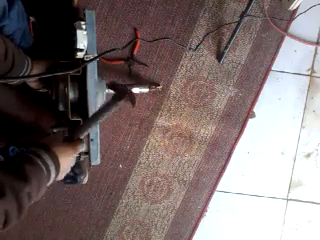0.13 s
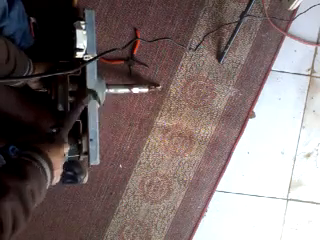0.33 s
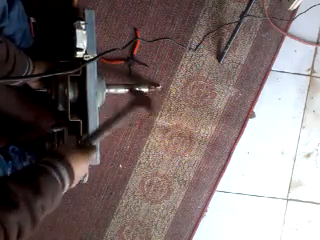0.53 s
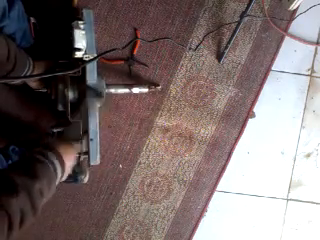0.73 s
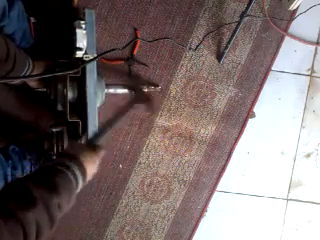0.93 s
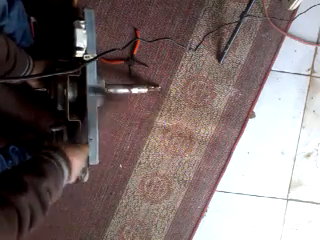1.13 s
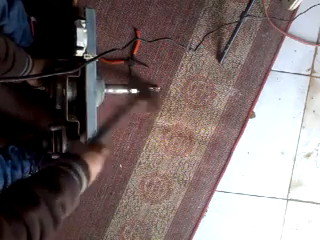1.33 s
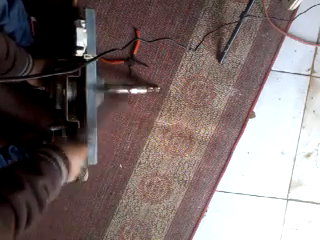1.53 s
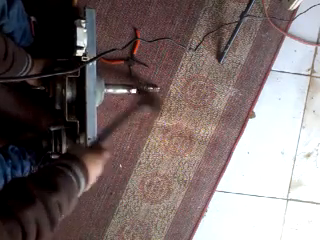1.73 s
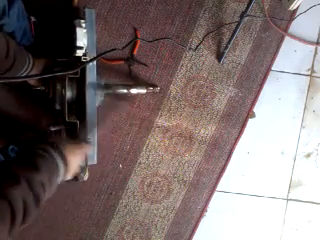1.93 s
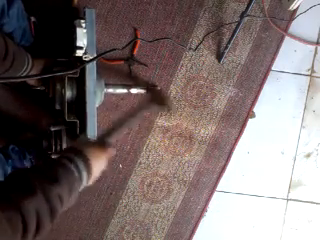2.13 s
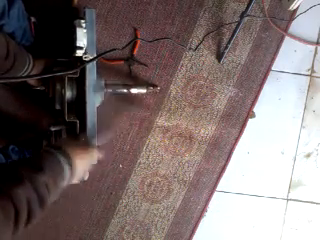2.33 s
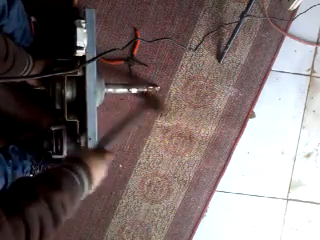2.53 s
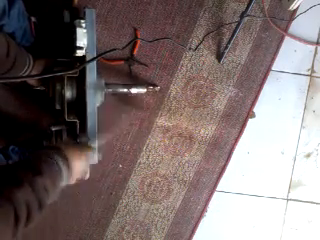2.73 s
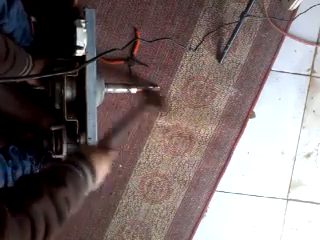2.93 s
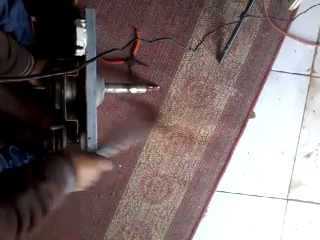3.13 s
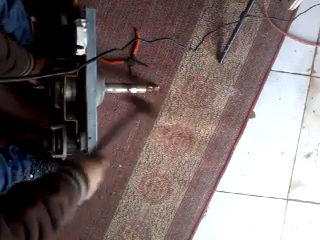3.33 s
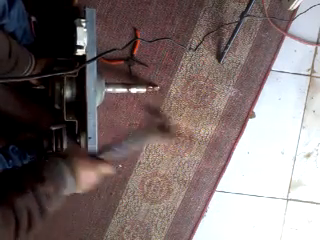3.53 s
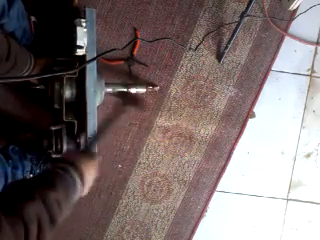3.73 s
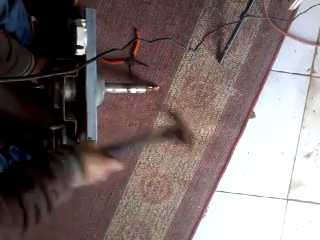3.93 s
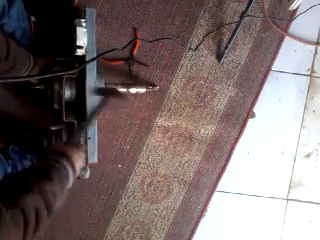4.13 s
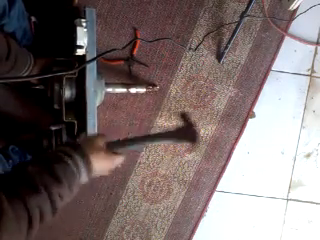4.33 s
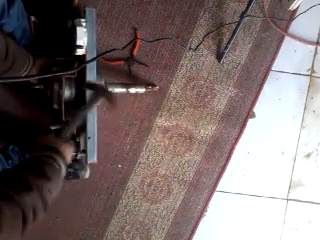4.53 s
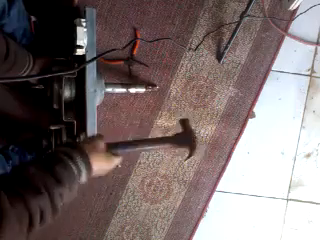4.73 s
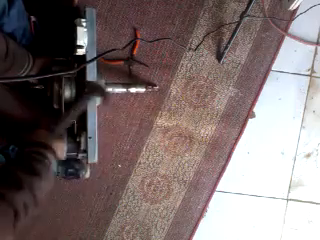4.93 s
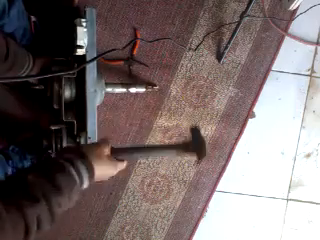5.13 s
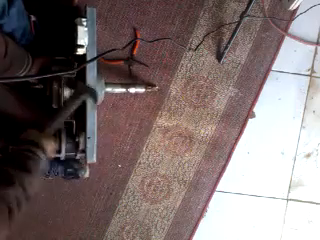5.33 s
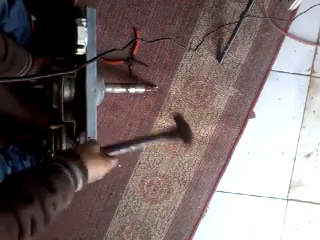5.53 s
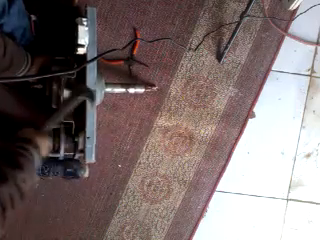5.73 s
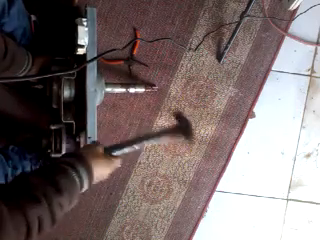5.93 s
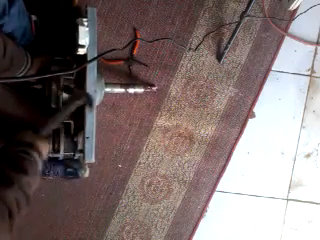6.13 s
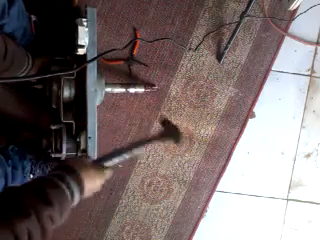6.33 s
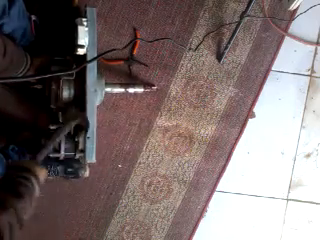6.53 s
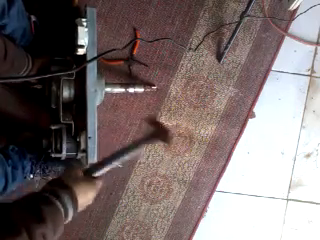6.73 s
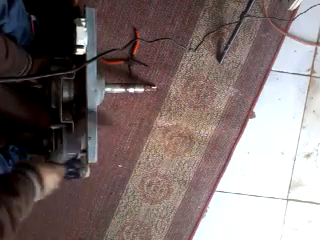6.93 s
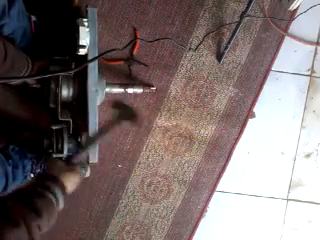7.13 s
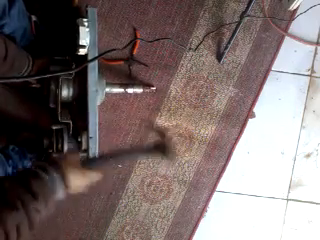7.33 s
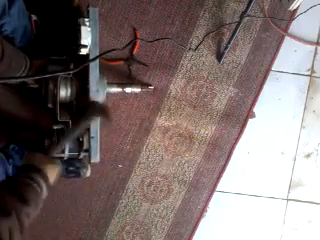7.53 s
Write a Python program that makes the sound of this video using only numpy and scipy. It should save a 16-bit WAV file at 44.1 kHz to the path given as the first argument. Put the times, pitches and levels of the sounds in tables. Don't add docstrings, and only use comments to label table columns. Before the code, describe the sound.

After a fading dull knock and faint ticks, even hammer blows clang on steel, ringing and rattling close by in a reverberant indoor room.

```python
import sys
import numpy as np
from scipy import signal
from scipy.fft import rfft, irfft
from scipy.io import wavfile
from scipy.ndimage import uniform_filter1d

SR = 44100
rng = np.random.default_rng(int(sys.argv[2]) if len(sys.argv) > 2 else 0)


def voltage_ratio(decibels):
    exponent = np.asarray(decibels, float) / 20
    return 10 ** exponent


def inscribe(sig):
    pcm = np.round(np.clip(np.atleast_2d(sig).T, -1, 1) * 32767)
    wavfile.write(sys.argv[1], SR, pcm.astype(np.int16))


N = 332955


def on_log_hz(table, hz):
    at, value = np.transpose(table)
    return np.interp(np.log(np.maximum(hz, 1)), np.log(at), value)


def coloured(size, table):
    spectrum = rfft(rng.standard_normal(size))
    gain = voltage_ratio(on_log_hz(table, np.fft.rfftfreq(size, 1 / SR)))
    x = irfft(spectrum * gain, size)
    return x / np.sqrt(np.mean(x ** 2))


def fade(t, t60):
    return np.exp(-np.log(1000) * t / t60)


# frequency in Hz, level in dB per Hz.
SHOP_HUSH = [(18, -34.5), (30, -3), (49, -38), (112, 2), (586, -16.5), (795, -7), (1390, -14), (5620, -14),
             (8880, -19), (13000, -22.5)]


def hush():
    return voltage_ratio(-45.5 - 24.0) * coloured(N, SHOP_HUSH)


# frequency in Hz, level in dB per Hz.
KNOCK_COLOUR = [(24, -57), (40, -25.5), (152, -1.5), (189, -14), (335, -11.5), (579, -15.5), (637, -16),
                (1240, -26), (8390, -33), (12000, -35), (15600, -60), (22000, -120)]


def dying_knock():
    knock_db, knock_t60_s = -51.5, 0.73
    return voltage_ratio(knock_db) * fade(np.arange(N) / SR, knock_t60_s) * coloured(N, KNOCK_COLOUR)


# start in seconds, peak in dB, pitch in Hz, t60 in seconds, scrape share from 0 to 1.
LOOSE_TICKS = [
    (0.007, -50, 2900, 0.04, 0.5),
    (0.011, -52, 3060, 0.04, 0.6),
    (0.114, -50, 832, 0.04, 0.5),
    (0.17, -51, 5640, 0.04, 0.6),
    (0.179, -51, 4730, 0.04, 0.7),
    (0.221, -54, 4830, 0.076, 0.5),
    (0.248, -56, 802, 0.04, 0.7),
    (0.254, -50, 5550, 0.04, 0.4),
    (0.311, -54, 6390, 0.04, 0.7),
]


def ticks():
    out, t = np.zeros(N), np.arange(SR // 10) / SR
    for s, peak_db, hz, t60, scrape in LOOSE_TICKS:
        grit = signal.lfilter([1], [1, -1.1, 0.55], rng.standard_normal(len(t))) * 0.37
        sound = (1 - scrape) * np.sin(2 * np.pi * hz * t) + scrape * grit
        out[int(s * SR):][:len(t)] += voltage_ratio(peak_db - 1.5) * fade(t, max(t60, 0.005)) * sound
    return out


# frequency in Hz, t60 in seconds.
WALL_T60 = [(70, 0.2), (125, 0.67), (300, 0.54), (800, 0.62), (1500, 0.59), (3000, 0.52), (5500, 0.49),
            (8000, .42), (12000, 0.37)]
# frequency in Hz, level in dB.
WALL_COLOUR = [(60, -8), (125, 5.7), (300, -1), (800, 3.7), (3000, -5), (5500, -3), (9000, -3),
               (14000, -10)]


def room():
    t = np.arange(SR) / SR
    hz = np.fft.rfftfreq(SR, 1 / SR)
    echoes = rfft(rng.standard_normal((2, SR)))
    tail = 0
    for centre in 40 * 2 ** np.arange(0, 9, 1 / 3):
        share = np.clip(1 - 3 * np.abs(np.log2(np.maximum(hz, 1) / centre)), 0, 1)
        band = irfft(echoes * share, SR)
        tail = tail + voltage_ratio(on_log_hz(WALL_COLOUR, centre)) * band * fade(t, on_log_hz(WALL_T60, centre))
    thickening = 1 - np.exp(-(t / 0.0035) ** 2)
    return voltage_ratio(-23) * tail * thickening


def looseness_db(s):
    loose_db, beds_in_s = -9.5, 2.2
    return loose_db * np.exp(-s / beds_in_s)


# frequency in Hz, level in dB per Hz.
FLOOR_RUMBLE = [(25, -12.5), (50, -15.5), (90, -6), (140, 3.5), (190, -5), (280, -23), (600, -73),
                (22000, -120)]


def rumble(s, t):
    swell = 1 - np.exp(-(t / 0.045) ** 2)
    return voltage_ratio(-44 + looseness_db(s)) * swell * fade(t, 0.82) * coloured(len(t), FLOOR_RUMBLE)


def floor_thud(t, thud_db):
    start_hz, sag_s = 256, 0.0077
    cycles = start_hz * sag_s * (1 - np.exp(-t / sag_s))
    pulse = (t / 0.0017) * np.exp(1 - t / 0.0015)
    return voltage_ratio(thud_db + 3.5) * pulse * np.sin(2 * np.pi * cycles)


def chatter(t):
    rattle_t60_s = 0.05
    onset = 1 - np.exp(-t / 0.0015)
    rattle = voltage_ratio(-13) * fade(t, rattle_t60_s) * onset * rng.standard_normal(len(t))
    rattle += voltage_ratio(-14.5) * fade(t, 0.015) * np.diff(rng.standard_normal(len(t) + 1))
    rattle += voltage_ratio(-12.5) * fade(t, 0.017) * rng.standard_normal(len(t))
    return rattle


# time of the blow in seconds, frequency in Hz, level over the body in dB.
SINGING_PARTIALS = [(0.44, 1590, 0.5), (3.31, 4290, 1.5), (0.44, 1180, 4), (0.88, 3160, 11.5),
                    (0.88, 4050, 3), (1.28, 773, 3.5), (3.72, 4217, 4), (1.69, 5560, 4), (1.69, 4750, 4),
                    (2.09, 2055, 8.5), (2.09, 5095, 8), (2.49, 5410, 4.5), (5.81, 562, 6.5),
                    (2.89, 5540, 4), (3.31, 765, 5), (3.31, 5910, 5.5), (3.72, 814, 3), (3.72, 421, 7.5),
                    (4.97, 1494, 7), (4.97, 4410, 5), (4.97, 1250, 7), (5.4, 1170, 5.5), (5.81, 2150, -1),
                    (5.81, 1937, 3), (6.22, 1970, 2.5), (6.22, 5840, 5.5), (6.61, 767, 6.5),
                    (6.61, 4145, 9), (7.08, 4110, 4), (7.08, 4750, 5.5)]


def partials_at(s):
    return [(f, db) for at, f, db in SINGING_PARTIALS if abs(at - s) < 0.1]


def singing(s, push, t, slow):
    out = np.zeros(len(slow))
    for f, _ in partials_at(s):
        share = abs(push @ np.exp(2j * np.pi * f * t))
        out += voltage_ratio(-50.5) * share * fade(slow, 0.58) * np.sin(2 * np.pi * f * slow)
    return out


RING_WIDTH_HZ = 1170
# time in seconds, centre in Hz.
RING_PATH = [(0.9, 5486), (1.3, 5420), (2.1, 5380), (2.5, 5500), (2.9, 5370), (4.1, 5640), (6.2, 5450),
             (7.1, 5500)]


def ring_centre(s):
    return np.interp(s, *np.transpose(RING_PATH))


def shaft_ring(s, t, square_db):
    rings_db, shaft_t60_s = -12.5, 0.56
    hz = ring_centre(s) + RING_WIDTH_HZ * (rng.random((24, 1)) - 0.5)
    modes = np.sin(2 * np.pi * (hz * t + rng.random((24, 1)))).sum(axis=0)
    return voltage_ratio(square_db + rings_db - 14) * fade(t, shaft_t60_s) * modes


def resonance(hz, modes, db):
    return sum(voltage_ratio(db + top_db) ** 2 / (1 + (2 * (hz - f) / width) ** 2) ** 1.4 for f, width, top_db in modes)


def causal(power):
    cepstrum = irfft(np.log(power) / 2)
    fold = np.r_[1, np.full(len(power) - 2, 2), 1, np.zeros(len(power) - 2)]
    return irfft(np.exp(rfft(cepstrum * fold)))


# frequency in Hz, width in Hz, level in dB.
FRAME_MODES = [(252, 130, -12.5), (482, 77, -1), (626, 222, -2.5), (809, 93, 0.5), (1171, 100, -5.5)]
PLATE_MODES = [(1280, 870, -5), (1703, 395, 0.5), (2015, 120, 5.5), (2383, 500, 5.5)]
EDGE_MODES = [(2953, 377, -2), (3285, 140, 0.4), (3498, 222, -1.5)]
FLANGE_MODES = [(3760, 120, -6), (4175, 670, -1), (4830, 500, -4.5)]
SHAFT_END_MODES = [(6580, 800, 2), (7270, 1300, -5)]
HEAD_MODES = [(8050, 760, -3), (8840, 2320, -0.5), (11110, 1400, -2), (13100, 240, -1.5), (13100, 580, -8)]


def blow(s, strength_db, square_db, glancing_db):
    hz = np.fft.rfftfreq(4096, 1 / SR)
    loose_db = looseness_db(s)
    power = resonance(hz, FRAME_MODES, -8.5 + loose_db + 0.25 * strength_db)
    power += resonance(hz, PLATE_MODES, -14 - 6 + 0.81 * loose_db - 0.31 * glancing_db)
    power += resonance(hz, EDGE_MODES, 7.5 + glancing_db)
    power += resonance(hz, FLANGE_MODES, 8 + glancing_db)
    power += voltage_ratio(square_db + 5) ** 2 / (1 + (2 * (hz - ring_centre(s)) / RING_WIDTH_HZ) ** 6)
    power += resonance(hz, SHAFT_END_MODES, -10.5 + 1.1 * loose_db + 0.23 * strength_db)
    power += resonance(hz, HEAD_MODES, -18 + strength_db)
    for f, db in partials_at(s):
        width_hz = 50 + 0.005 * f
        power *= voltage_ratio(db / (1 + (2 * (hz - f) / width_hz) ** 2)) ** 2
    power *= voltage_ratio(0.26 * strength_db * np.clip((hz - 9000) / 4000, 0, 1)) ** 2
    ripple = uniform_filter1d(rng.standard_normal(len(hz)), size=5)
    ripple = uniform_filter1d(ripple, size=5)
    power *= voltage_ratio(4.2 * np.clip(hz / 1500, 0.6, 1) * ripple) ** 2
    return causal(power / (1 + (230 / np.maximum(hz, 5)) ** 6))


# start in seconds, strength in dB, squareness in dB, glancing share in dB, thud in dB.
HAMMER_BLOWS = [(0.4397, -5.5, -18, -16.5, -54), (0.8763, 0, -9, -19, -53.5),
                (1.2837, -0.5, -8, -17, -47.5), (1.6881, 3, -10.5, -16, -38.5),
                (2.0892, 2.1, -10, -16.5, -43), (2.4932, 3.1, -6, -16.5, -33),
                (2.8924, 2.5, -7.5, -17.5, -20), (3.3057, 2, -14, -11, -29), (3.7183, 1, -17, -11.5, -38.5),
                (4.1297, -0.2, -10, -17, -32), (4.56, 2.5, -10, -16.5, -18.5),
                (4.9692, -2, -12, -14.5, -43.5), (5.397, 2.2, -10.5, -17.5, -19),
                (5.8092, -4.5, -14.5, -16.5, -33), (6.217, -2.5, -13.5, -16.5, -34),
                (6.6139, 0.5, -12.5, -13, -39.5), (7.0781, 3, -9.5, -11.5, -47),
                (7.5261, 5.5, -5, -15, -20.5)]


def hammering():
    t, slow = np.arange(4096) / SR, np.arange(SR) / SR
    half = SR // 2
    early = int(1.6 * SR / 1000)
    pushes = np.zeros((2, N + SR))
    close, floor = np.zeros((2, N + SR))
    for s, strength_db, square_db, glancing_db, thud_db in HAMMER_BLOWS:
        lateness, facing = rng.random(2)
        i = int(s * SR)
        push = voltage_ratio(25) * blow(s, strength_db, square_db, glancing_db)
        pushes[0, i:i + len(t)] += push * np.cos(np.pi * facing)
        pushes[1, i:i + len(t)] += push * np.sin(np.pi * facing)
        rattle = signal.fftconvolve(push, chatter(t))[:len(t)]
        struck = voltage_ratio(-7.5) * push + voltage_ratio(-4) * rattle
        close[i:i + len(t)] += struck
        close[i - early:][:len(t)] += voltage_ratio(-32) * struck
        close[i:i + SR] += singing(s, push, t, slow)
        close[i:i + half] += shaft_ring(s, slow[:half], square_db)
        late_ms = 8.0 * lateness ** 2
        j = i + int((4.0 + late_ms) * SR / 1000)
        close[j:j + len(t)] -= voltage_ratio(-9 - 0.65 * late_ms) * struck
        floor[i:i + len(t)] += floor_thud(t, thud_db)
        close[i:i + SR] += rumble(s, slow)
    return pushes[:, :N], close[:N], floor[:N]


def scene():
    background = hush() + dying_knock() + ticks()
    pushes, close, thud = hammering()
    walls = signal.fftconvolve(pushes + voltage_ratio(-26.5) * thud, room(), axes=1).sum(axis=0)[:N]
    return (background + walls + thud + close)[None]


def top_cut(x):
    return signal.sosfilt(signal.butter(12, 14860, fs=SR, output="sos"), x)


def record(dry):
    top = signal.ellip(8, 0.2, 35, 13900, fs=SR, output="sos")
    cut = signal.sosfilt(np.vstack([top, top]), dry)
    overload = 0.62
    clipped = cut / (1 + np.abs(cut / overload) ** 8) ** (1 / 8)
    clipped = signal.sosfiltfilt(top, clipped) * 0.7 + clipped * 0.3
    thin = signal.sosfilt(signal.butter(2, 62, "high", fs=SR, output="sos"), clipped)
    return top_cut(thin)


dry = scene()
out = record(dry)
inscribe(out)
```